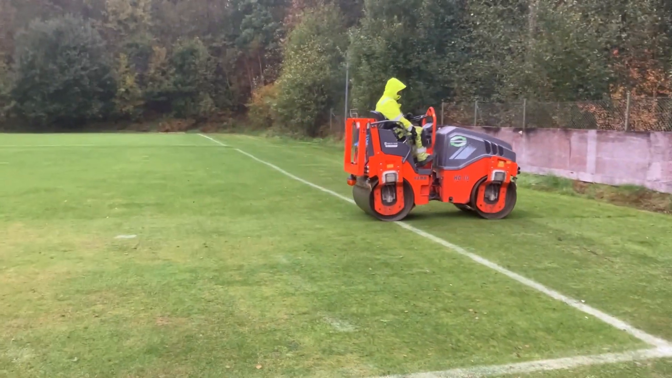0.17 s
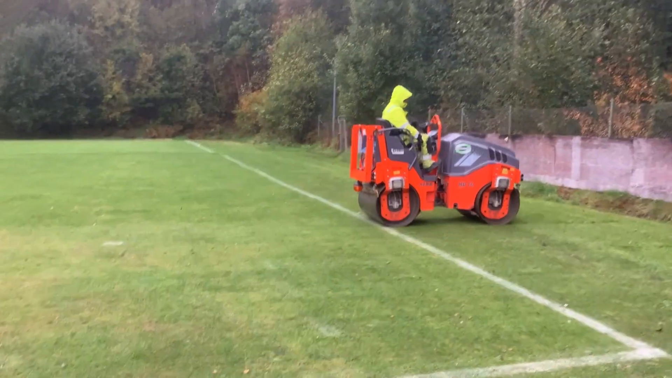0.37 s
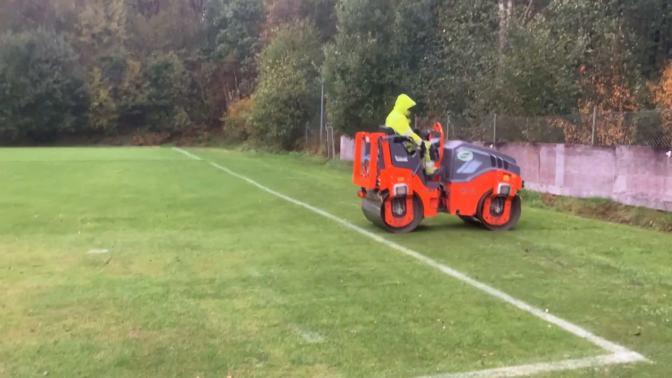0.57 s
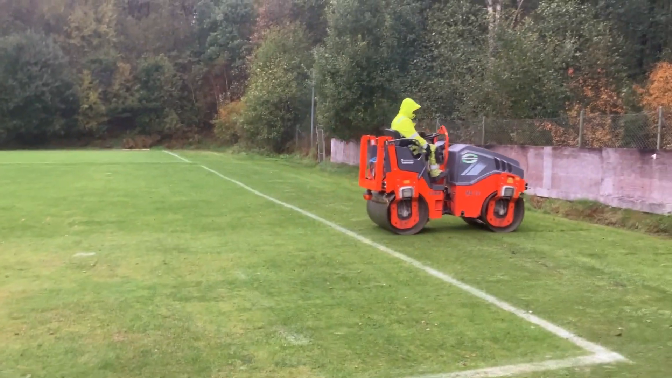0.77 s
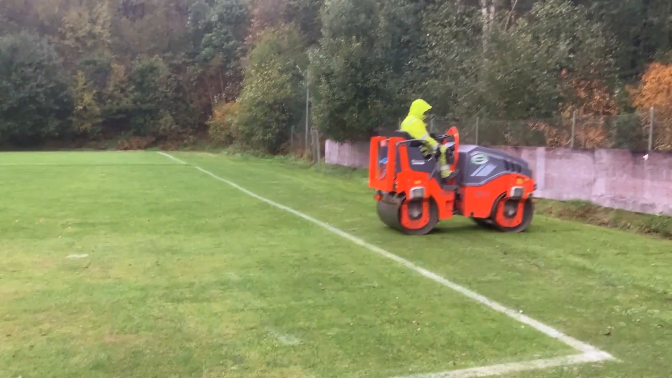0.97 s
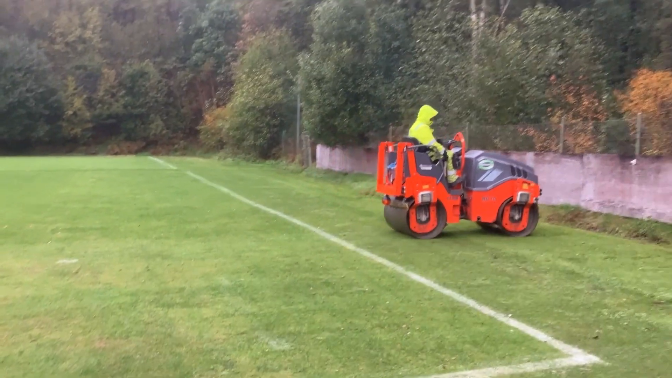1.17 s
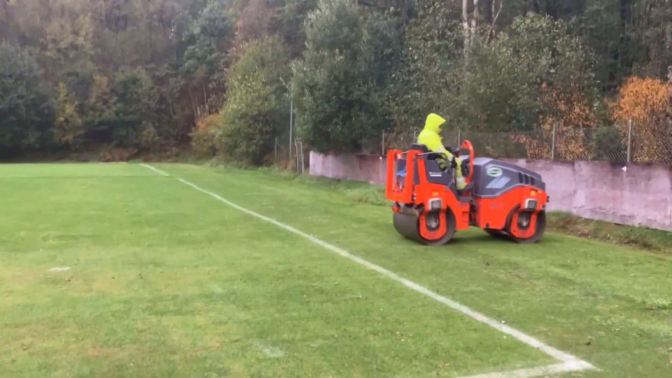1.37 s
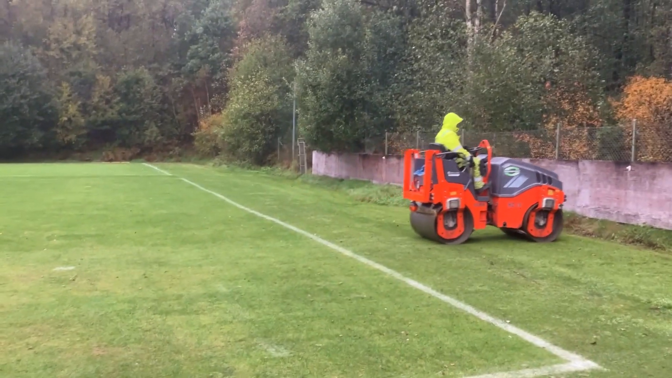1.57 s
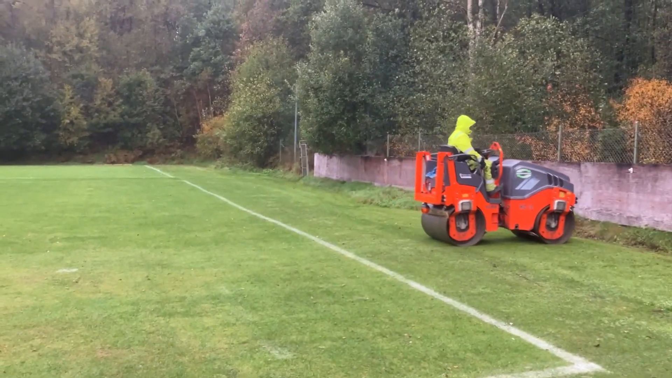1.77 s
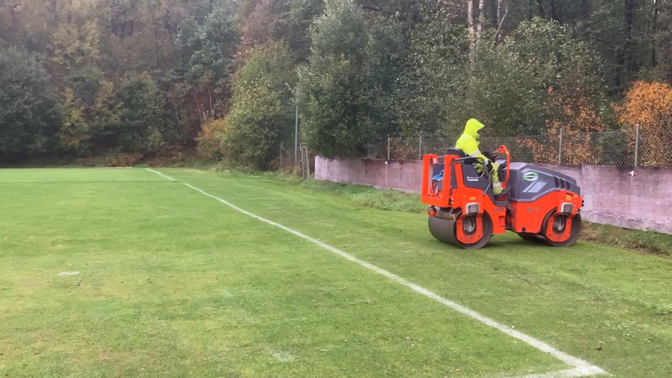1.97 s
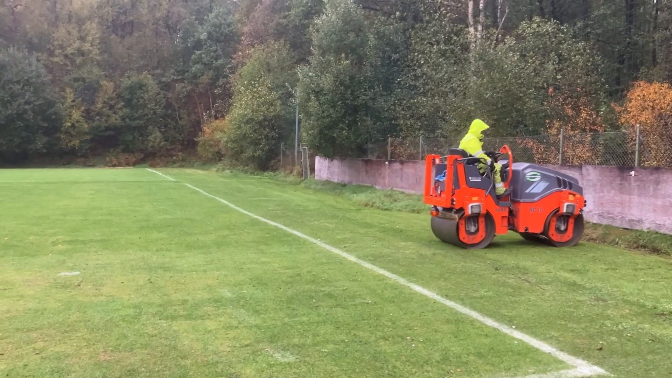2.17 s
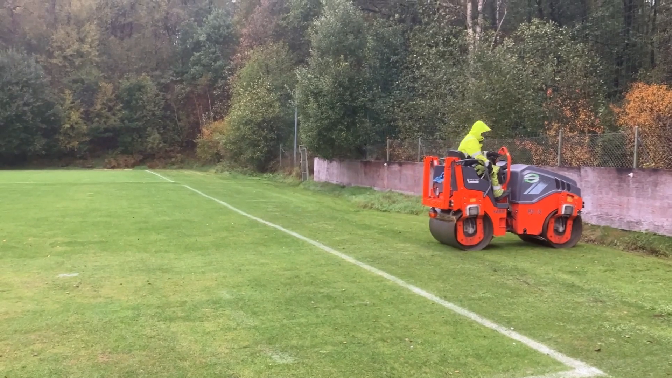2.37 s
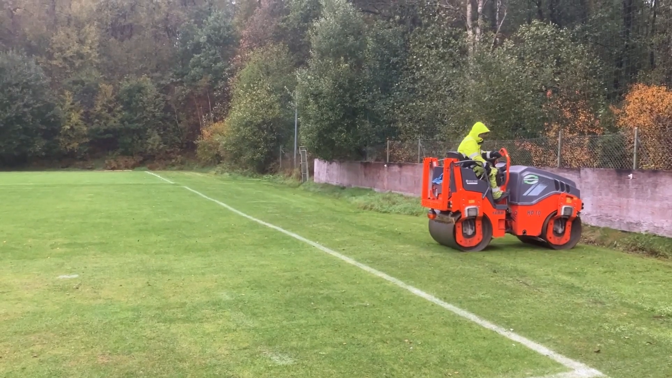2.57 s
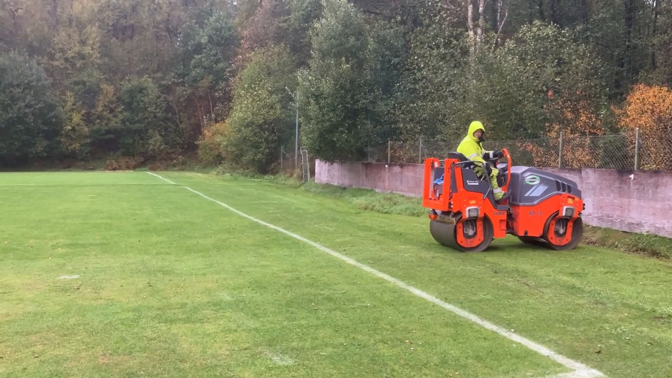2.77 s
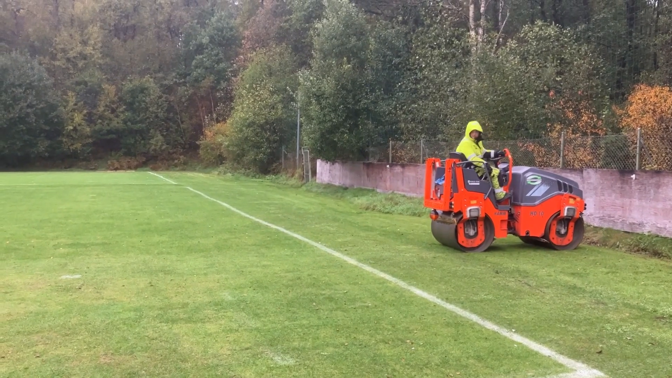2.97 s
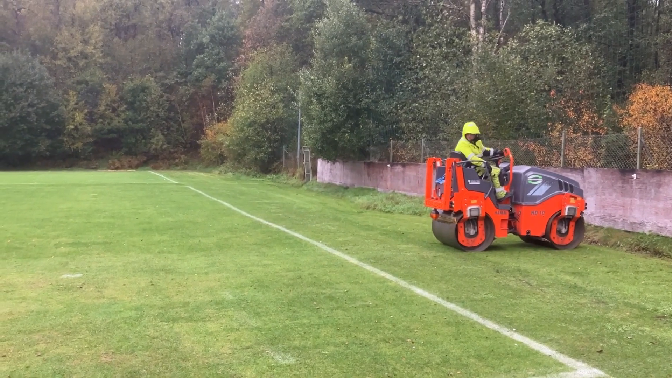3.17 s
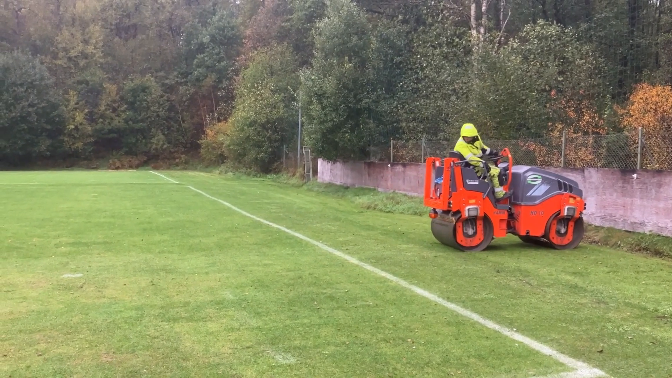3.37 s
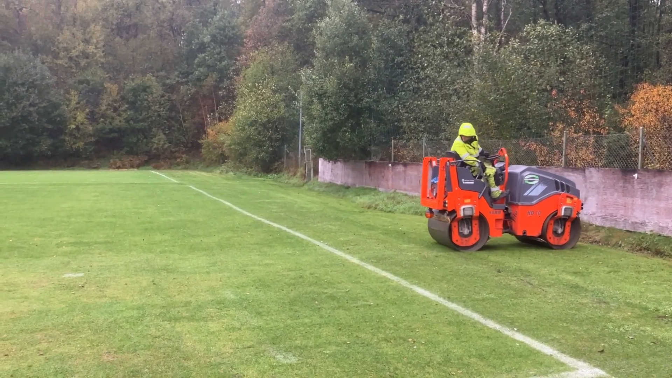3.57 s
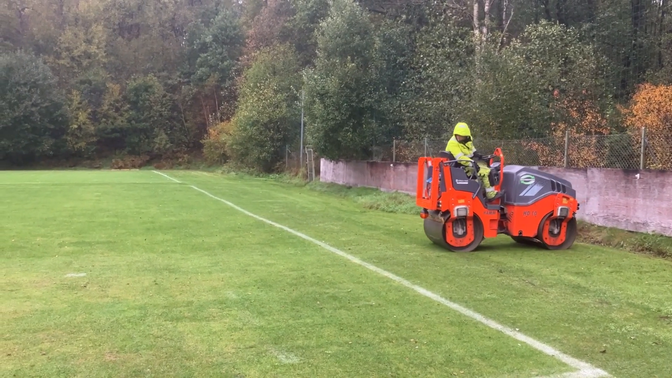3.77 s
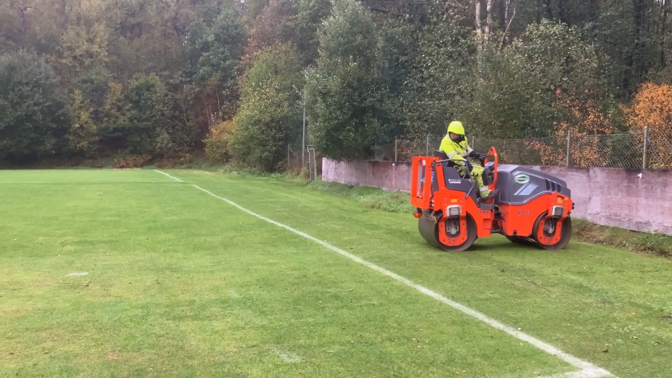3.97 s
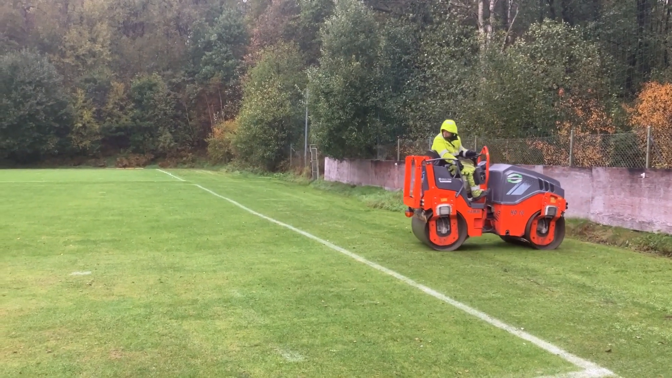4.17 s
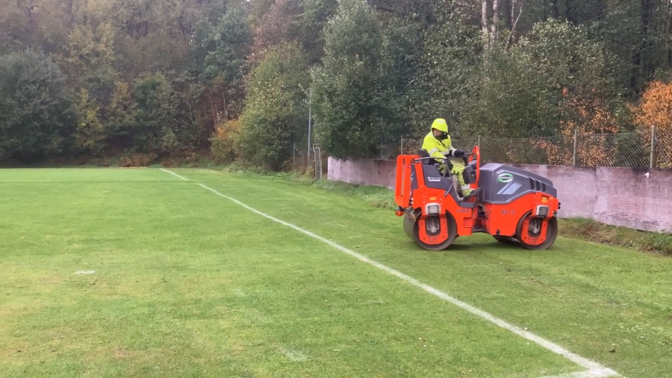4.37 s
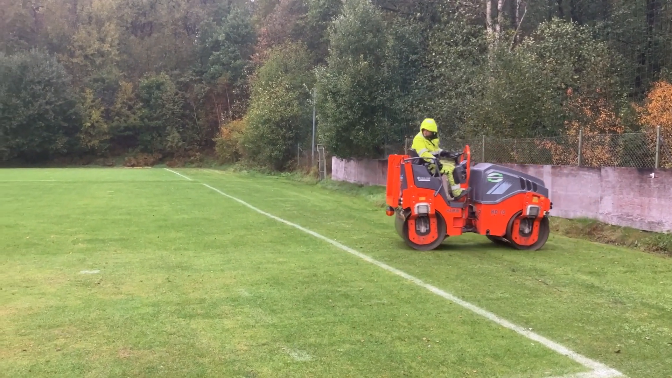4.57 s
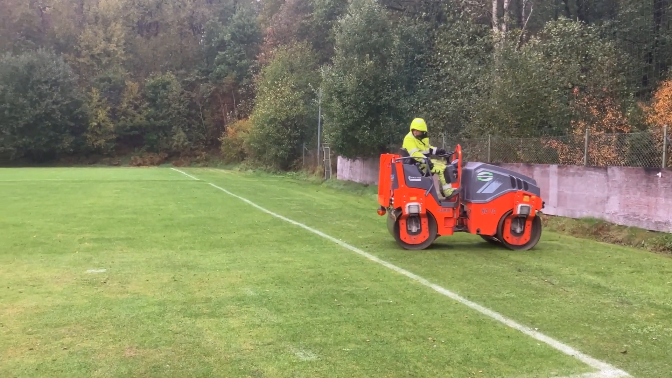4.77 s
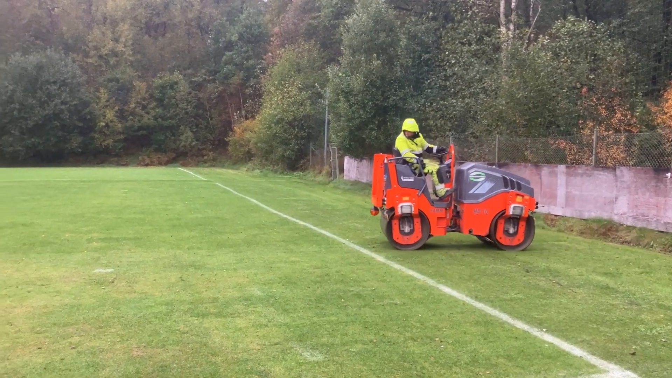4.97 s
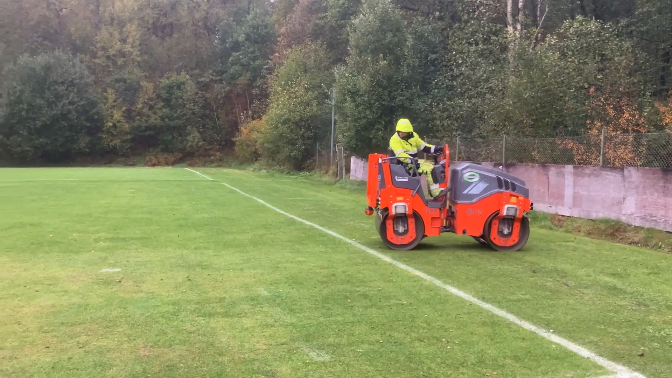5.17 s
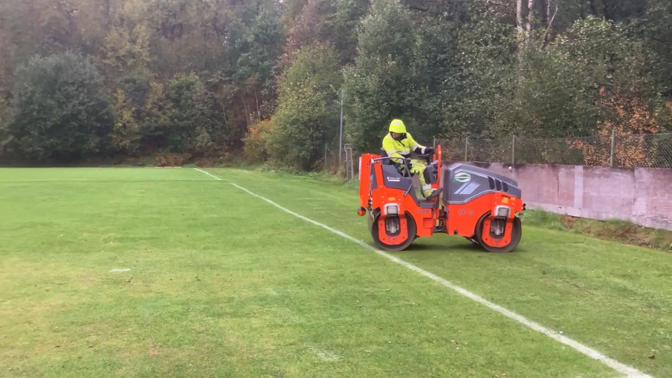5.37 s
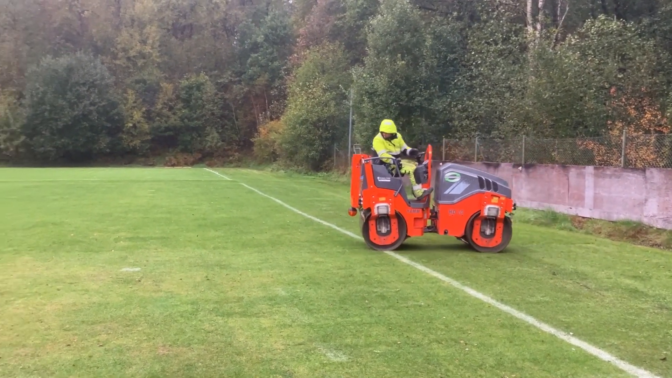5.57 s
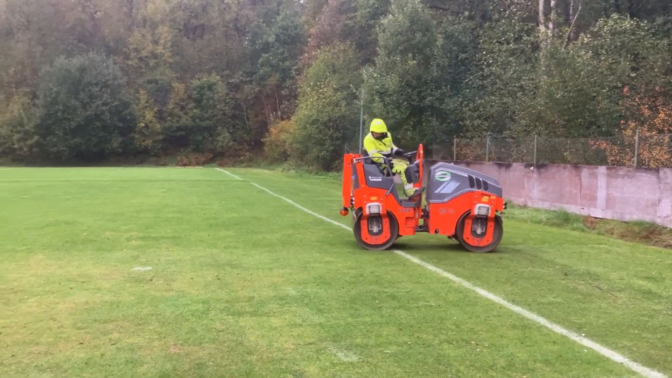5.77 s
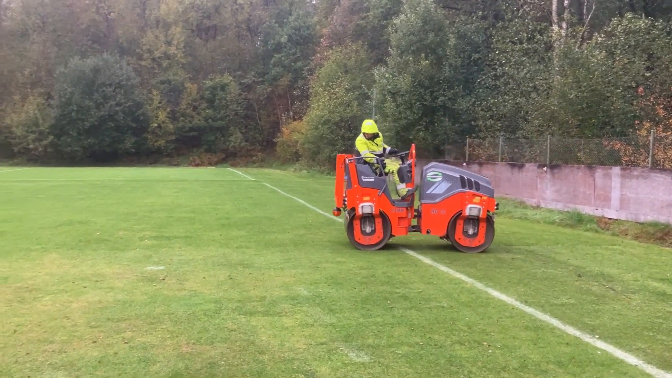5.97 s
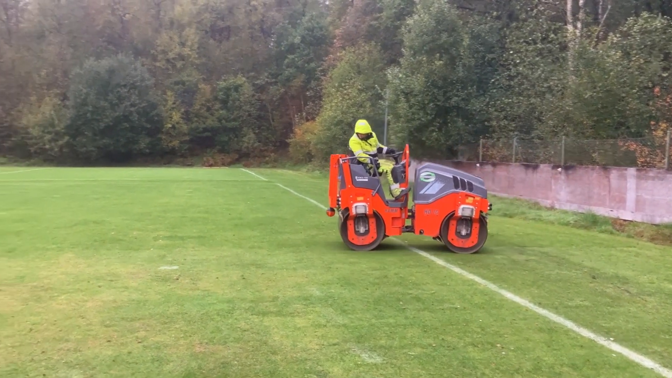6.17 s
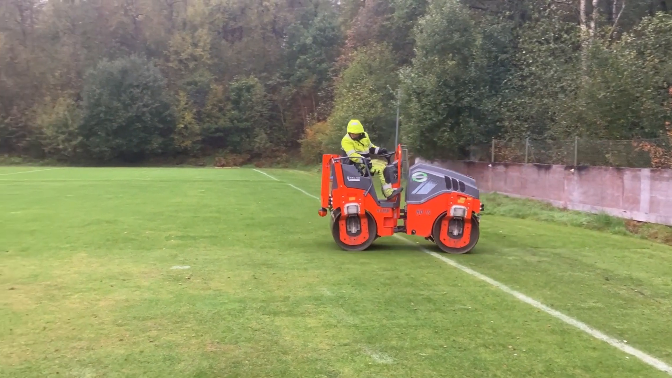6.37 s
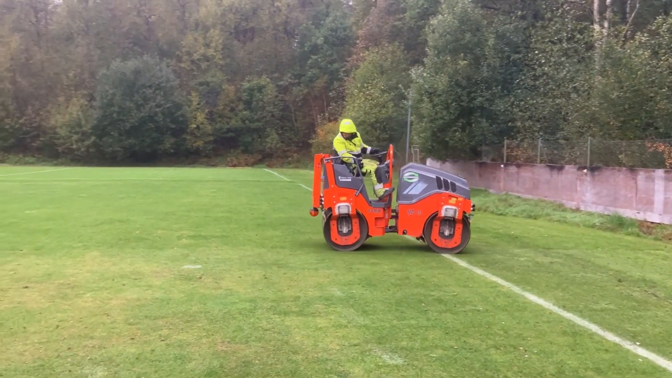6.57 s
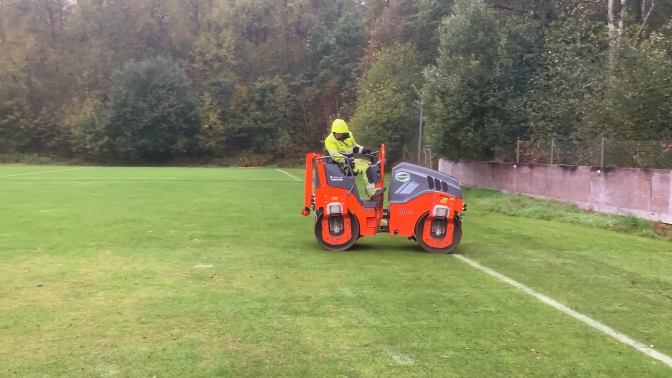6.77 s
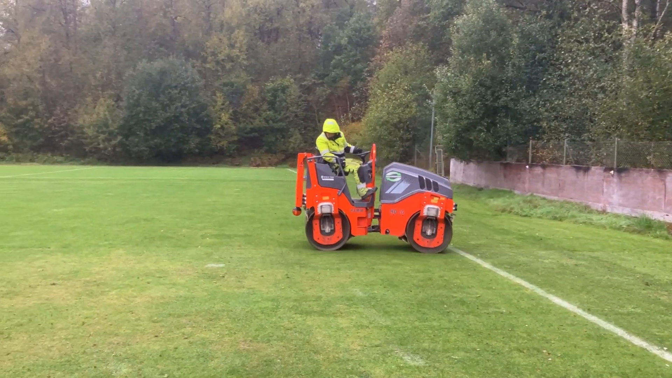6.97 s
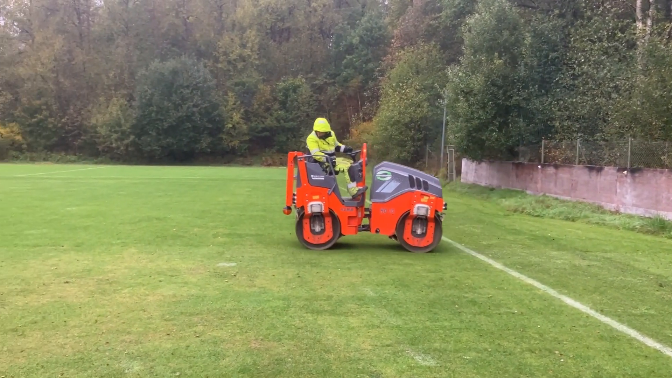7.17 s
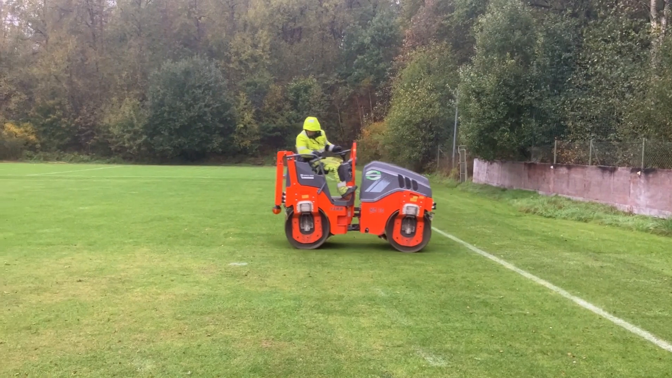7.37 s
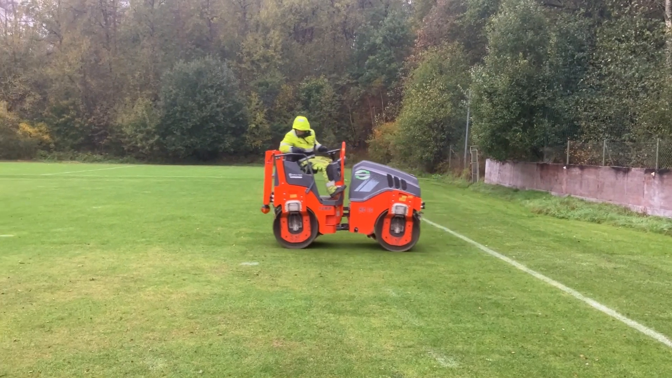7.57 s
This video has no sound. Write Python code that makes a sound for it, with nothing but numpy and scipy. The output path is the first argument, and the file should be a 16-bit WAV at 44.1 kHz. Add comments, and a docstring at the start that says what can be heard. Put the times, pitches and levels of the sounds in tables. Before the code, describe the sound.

Outdoors on a grass pitch, a small three-cylinder diesel roller drones at about 70 firings per second, with a strong octave, soft rumble, rapid ticking and hydraulic hiss, picked up in stereo from a moderate distance. At first the drums add a low hum and a motor whine near 800 Hz. From 0.8 s these glide down and fade, the engine easing slightly. Around 1.15 to 1.5 s the frame shudders and thuds and the steering joint clanks sharply; another dull knock comes at 1.75 s. The roller backs up, drive whine climbing, then steady among pump tones until about 4 s as it nears. At 4.8 s the drums spin up with a quick rising whine; the engine sags and strains. Speed overshoots, dips near 5.9 s, with a brief panel ring, then recovers. By 6.5 s a heavy low hum beats against the exhaust, continuing to the end at 7.6 s.

```python
"""The three-cylinder diesel of a small tandem roller drones on a grass pitch: an exhaust tone at the firing
rate and another an octave above it, weaker lines between them, and noise that flares at each firing.
Weights shake a drum with a hum. They coast down, the roller clanks and backs up, then they spin up
again: the engine is dragged down and the hum beats against the exhaust note. Gear motors and pumps
whine with the speed of their shafts, oil hisses, and a wall and trees scatter the sound."""
import sys
import numpy as np
from scipy import signal
from scipy.fft import rfft, irfft
from scipy.io import wavfile

SR = 44100
rng = np.random.default_rng(int(sys.argv[2]) if len(sys.argv) > 2 else 0)


def unload_audio(sound):
    """Save the sound as a 16-bit wav file, at the path given as the first command line argument."""
    columns = np.transpose(np.atleast_2d(sound))
    # keep every value between -1 and 1, then stretch to whole-number steps
    steps = np.round(np.clip(columns, -1, 1) * 32767)
    wavfile.write(sys.argv[1], SR, steps.astype(np.int16))


N = 336042
T = np.arange(N) / SR  # time of every sample [s]
HZ = np.fft.rfftfreq(N, 1 / SR)  # frequencies of the whole sound's spectrum

RUN_HZ = 66.4  # working speed of the weights, turns per second

# engine speed, sagging as the hydraulics draw power: (time [s], firing rate [firings per second])
FIRING_RATE = [(0, 70.05), (0.8, 70.05), (1.15, 71.5), (2.9, 71.5), (3.45, 70.59), (4.6, 70.49),
               (4.85, 68.37), (5.3, 66.4), (5.52, 68.9), (5.78, 66.8), (6.25, 67.86), (6.5, 69.88),
               (7.1, 69.4), (7.62, 69.4)]
# how hard the engine works: (time [s], load [0-1])
ENGINE_LOAD = [(0, 0.72), (1.15, 0.62), (1.7, 0), (2.5, 0.24), (3.5, 0.47), (3.85, 0.29), (4.5, 0.7),
               (4.9, 0.99), (6.3, 1), (6.6, 0.77), (7.62, 0.85)]
# roller's place on the field: (time [s], nearness [0-1])
NEARNESS = [(0, 0.59), (1.2, 0.36), (2, 0), (4.2, 0.27), (5.3, 0.87), (7.62, 0.98)]
# the weights are switched on again, overshoot and hunt before they settle:
# (time [s], front drum [turns per second], rear drum [turns per second])
RESTART = [(4.8, 0, 0), (5.15, 59.78, 57), (5.3, 62.88, 67.4), (5.47, 66.51, 69.7), (5.6, 61.63, 63),
           (5.8, 54.61, 58), (5.95, 53.22, 57), (6.05, 55.22, 62), (6.2, 58.87, 64), (6.35, 65.18, 67.4),
           (6.5, 66.53, 68.3), (6.8, 66.91, 66.3), (7, 65.8, 65.6), (7.62, 65.99, 65.7)]
# colour of the low rumble: (frequency [Hz], relative level [dB per Hz])
RUMBLE_COLOUR = [(20, -28), (35, -9), (50, -6), (90, -1), (170, -1), (290, -8.5), (370, -16), (500, -17),
                 (1000, -76.5)]


def amp(db):
    """Turns decibels into gain."""
    return 10 ** (np.asarray(db) / 20)


def unit(x):
    """Scales a sound to rms 1."""
    return x / np.sqrt(np.mean(x ** 2) + 1e-20)


def curve(rows, axis=1):
    """Reads one column of a time table at every sample."""
    rows = np.array(rows)
    return np.interp(T, rows[:, 0], rows[:, axis])


def shape(rows, hz, axis=1):
    """Reads one column of a frequency table, joined on a log axis."""
    rows = np.array(rows)
    return np.interp(np.log(hz + 1), np.log(rows[:, 0] + 1), rows[:, axis])


def colour(x, rows):
    """Filters a sound by a frequency table and scales it to rms 1."""
    return unit(irfft(rfft(x) * amp(shape(rows, HZ)), N))


def octave_band(x, hz, octaves):
    """Keeps a bell-shaped band around one frequency."""
    distance = np.log2((HZ + 1) / hz) / octaves
    return irfft(rfft(x) * np.exp(-.5 * distance ** 2), N)


def wander(rate_hz):
    """Drifts slowly at random, with rms 1."""
    steps = N // 40
    hz = np.fft.rfftfreq(steps, T[-1] / steps)
    slow = irfft(rfft(rng.standard_normal(steps)) / (1 + (hz / rate_hz) ** 4), steps)
    return unit(np.interp(T, np.linspace(0, T[-1], steps), slow))


def tone(turns, rough, rate_hz):
    """Makes a machine tone of rms 1 whose strength and phase waver."""
    sway = 1 + rough * (wander(rate_hz) + 1j * wander(rate_hz))
    return unit((sway * np.exp(2j * np.pi * turns)).real)


def bursts(firings, length, steady, lead=.22):
    """Makes noise that flares just ahead of each exhaust pulse and dies away (times in firings)."""
    # force of each cylinder's firing: (level [dB])
    cylinder_db = (3, -2, -0.5)
    turns = firings + lead
    force = amp(cylinder_db)[turns.astype(int) % len(cylinder_db)]
    flare = force * np.exp(-(turns % 1) / length)
    return (steady + flare) * rng.standard_normal(N)


def blow(ring, s, db, decay, rise_s):
    """Shapes a ringing noise into one blow that rises fast and dies away."""
    age = np.maximum(T - s, 0)
    sound = ring * (1 - np.exp(-age / rise_s)) * np.exp(-age / decay)
    return amp(db) * sound * np.sqrt(decay * SR / np.sum(sound ** 2))


def drag():
    """Tells how far oil pressure pulls the engine below its free speed (square root of the sag in Hz)."""
    free_hz = 71.66  # firings per second with nothing to drive
    return np.sqrt(np.maximum(free_hz - curve(FIRING_RATE), 0))


def effort(load_db=-0.3, near_db=4.0):
    """Gives engine noise in dB about its mean: it rises with nearness and falls very slightly with load."""
    level = load_db * curve(ENGINE_LOAD) + near_db * curve(NEARNESS)
    return level - level.mean()


def vibrator(column, slip=0):
    """Gives speed and turn count of one drum's weights: steady, coasting down, then started again."""
    switch_off_s, coast_s = .81, .62
    coasting = (RUN_HZ + slip) * np.exp(-np.maximum(T - switch_off_s, 0) / coast_s)
    spinning = curve(RESTART, axis=column)
    again = spinning > 0
    speed = np.where(again, spinning, coasting)
    turns = np.where(again, np.cumsum(spinning), np.cumsum(coasting)) / SR
    return speed, turns


def unsettled():
    """Gives a number of decibels that is largest at the second start and shrinks on either side of it."""
    settle_db, settle_s = 98, 0.59
    return settle_db * np.exp(-abs(T - RESTART[0][0]) / settle_s)


def field(db=-36):
    """Low rumble spreads over the open ground, unrelated at the two microphone ports."""
    rumble = np.array([colour(rng.standard_normal(N), RUMBLE_COLOUR) for _ in range(2)])
    return amp(db + effort()) * rumble


def surroundings(x, drift_hz=4):
    """Wall and trees scatter the sound: phases are scrambled differently at each port and keep drifting."""
    # strength of the scattered sound: (frequency [Hz], gain [dB])
    scatter_gain = [(70, -9), (140, -14), (250, -5.5), (600, -8), (1300, -1.5), (2500, -0.5), (5000, -2.5),
                    (8000, -10.5), (15000, -89)]
    hz, t, z = signal.stft(x, SR, nperseg=2048, noverlap=1536)
    chance = rng.standard_normal((2, *z.shape)) + 1j * rng.standard_normal((2, *z.shape))
    slow = np.exp(-.5 * (np.fft.fftfreq(len(t), t[1]) / drift_hz) ** 2)
    # only the drifting phase is kept
    paths = np.exp(1j * np.angle(np.fft.ifft(np.fft.fft(chance) * slow)))
    gain = amp(shape(scatter_gain, hz))[:, None]
    scattered = signal.istft(z * paths * gain, SR, noverlap=1536)[1]
    return np.sqrt(2) * scattered[:, :N]


def ports(x):
    """Direct sound reaches the two microphone ports out of step, by an amount that follows the roller."""
    # head start of the left port: (frequency [Hz], roller at the far end [radians], nearer [radians])
    left_lead = [(100, 0, 0), (500, -.8, -.3), (1200, -1.2, -.3), (2000, -3, -.4), (3100, -9.4, -4.9),
                 (4100, -12.5, -8.2), (6000, -16.6, -10.3), (6550, -15.7, -9.4), (7900, -12.6, -6.3),
                 (9850, -9.4, -3.1), (11400, -6.3, 0), (13100, -3.1, 3.1), (14700, 0, 6.3)]
    hz, t, z = signal.stft(x, SR, nperseg=1024)
    near = np.clip(np.interp(t, T, curve(NEARNESS)), 0, 1)
    far_lead = np.exp(1j * shape(left_lead, hz, axis=1))[:, None]
    near_lead = np.exp(1j * shape(left_lead, hz, axis=2))[:, None]
    lead = np.exp(1j * np.angle((1 - near) * far_lead + near * near_lead))
    left = signal.istft(z * lead, SR)[1][:N]
    return np.array([left, x])


def over_grass(x, dip_hz=780, octaves=0.091, depth=0.42):
    """The reflection off the turf cancels part of the midrange, more so when the roller is far."""
    band = octave_band(x, dip_hz, octaves)
    return x - depth * (1 - curve(NEARNESS)) ** 2 * band


def judder(db=-28.0, hz=65, octaves=0.35, middle_s=1.3, half_s=0.63):
    """The frame shudders on its rubber mounts while the roller stops and starts back: swelling low noise."""
    shake = octave_band(rng.standard_normal(N), hz, octaves)
    return amp(db) * np.exp(-((T - middle_s) / half_s) ** 2) * unit(shake)


def knocks(rise_s=0.0057):
    """Slack in the frame is taken up as the roller turns back and the drums stop or start: damped blows."""
    # blows: (time [s], level [dB], centre [Hz], width [octaves], decay [s])
    frame_blows = [(1.155, -17, 70, 0.62, 0.021), (1.382, -20.5, 170, 0.45, 0.0091),
                   (1.428, -31, 480, 0.46, 0.026), (1.444, -24, 230, 0.35, 0.011),
                   (1.478, -22, 130, 0.52, 0.024), (1.753, -14, 80, 0.22, 0.028),
                   (1.765, -41, 8100, 0.22, 0.013), (1.83, -42, 8000, .25, .012),
                   (1.895, -44, 8000, 0.23, .012), (4.96, -37, 1400, 0.57, 0.084),
                   (5.355, -25.5, 620, 0.41, .016)]
    out = np.zeros(N)
    for s, db, hz, width, decay in frame_blows:
        ring = octave_band(rng.standard_normal(N), hz, width)
        out += blow(ring, s, db, decay, rise_s)
    return out


def clanks(rise_s=0.0024):
    """The steering joint chatters, strikes its stop and rebounds: short blows of coloured noise."""
    # blows as the roller changes direction: (time [s], level [dB], decay [s])
    joint_blows = [(1.347, -38, .015), (1.362, -32, 0.015), (1.38, -22.5, .009), (1.392, -30, 0.0079),
                   (1.43, -35, 0.018)]
    # what the joint rings with: (frequency [Hz], relative level [dB per Hz])
    joint_colour = [(300, -11), (650, -4), (1100, 3.5), (1450, -1), (1850, 0.5), (2200, -5), (2420, -24),
                    (3500, -20), (5000, -47)]
    out = np.zeros(N)
    for s, db, decay in joint_blows:
        ring = colour(rng.standard_normal(N), joint_colour)
        out += blow(ring, s, db, decay, rise_s)
    return out


def panel():
    """A panel sings briefly at one pitch while the weights linger at low speed."""
    middle_s, half_s, hz, db = 5.98, .15, 1095, -41.5
    swell = np.exp(-((T - middle_s) / half_s) ** 4)
    return amp(db) * swell * tone(hz * T, rough=.3, rate_hz=7.4)


def bonnet(firings, ring_hz=1310, width_hz=55, db=-50, far_db=17):
    """Firings make a bonnet panel ring with a few metallic lines, louder as the roller comes near."""
    # lines, before the fading with distance: (multiple of the four-stroke cycle, level [dB])
    bonnet_orders = [(54, -58), (55, -45.5), (57, -51), (59, -46)]
    noise = bursts(firings, length=0.12, steady=0.36)
    ring = irfft(rfft(noise) / (1 + ((HZ - ring_hz) / width_hz) ** 2), N)
    lines = sum(amp(level) * tone(k * firings / 3, rough=.5, rate_hz=3) for k, level in bonnet_orders)
    return (amp(db) * unit(ring) + lines) * amp(-far_db * (1 - curve(NEARNESS)))


def drive(power=1.2):
    """Drive motors' tones climb and swell with the ground speed backwards, then sink and fade."""
    reverse_s, gather_s, shaft_hz = 1.0, .36, 22.05
    ease_at_s, ease_s, ease_hz = 3.0, 1.0, 1.54  # the driver eases off
    # lines, before the swell and fade: (multiple of the shaft's turn, level [dB])
    drive_orders = [(12, -41.5), (13, -34.5), (14, -35.5)]
    gathered = 1 - np.exp(-np.maximum(T - reverse_s, 0) / gather_s)
    easing = np.clip((T - ease_at_s) / ease_s, 0, 1) ** 3
    turns = np.cumsum(shaft_hz * gathered - ease_hz * easing) / SR
    lines = sum(amp(db) * tone(k * turns, rough=.25, rate_hz=8) for k, db in drive_orders)
    return lines * gathered ** power * (1 - easing)


def charge_pump(firings):
    """A second pump hums at sixteen times the four-stroke cycle, swelling and fading."""
    # loudness of its tone: (time [s], level [dB])
    charge_level = [(0.05, -34.5), (0.21, -44), (0.4, -32), (0.62, -41), (0.88, -32), (1.08, -45),
                    (1.3, -42.5), (1.68, -37), (1.95, -46.5), (2.55, -48), (2.85, -50), (3.15, -44),
                    (3.6, -48), (3.8, -33), (4.1, -53), (4.45, -34.5), (4.72, -56), (5.08, -34.5),
                    (5.35, -43.5), (5.6, -31.5), (5.97, -42), (6.15, -36.5), (6.6, -36), (7.15, -35),
                    (7.4, -45), (7.6, -30.5)]
    return amp(curve(charge_level)) * tone(16 * firings / 3, rough=.22, rate_hz=8)


def pump(firings, overtone_db=-17):
    """The hydraulic pump sings at eight strokes to a firing, with a weaker tone at three times that."""
    # loudness of its main tone: (time [s], level [dB])
    pump_level = [(0, -56), (1, -40.5), (1.2, -44), (1.65, -40), (2.33, -41.5), (2.5, -53), (2.7, -40),
                  (3.4, -41), (3.9, -36), (4.65, -32.5), (5.05, -44.5), (6.2, -41), (6.6, -38.5),
                  (7.62, -61)]
    strokes = 8 * firings
    main = tone(strokes, rough=.16, rate_hz=12)
    overtone = amp(overtone_db) * tone(3 * strokes, rough=.25, rate_hz=10)
    return amp(curve(pump_level)) * (main + overtone)


def singing_valve(firings):
    """A valve sings briefly at multiples of the firing rate."""
    middle_s, half_s = 3.44, .21
    # lines at the height of the song: (multiple of the firing rate, level [dB])
    sing_orders = [(16, -54), (24, -51), (36, -58)]
    lines = sum(amp(db) * tone(k * firings, rough=0.14, rate_hz=7.3) for k, db in sing_orders)
    return np.exp(-((T - middle_s) / half_s) ** 4) * lines


def oil(speed, turns, hiss_db=-49.5, squirt_db=-56, pressure_db=4.0, flow_db=4.0, near_db=0.5):
    """Oil hisses with flow and pressure; under heavy load it squirts past the gear teeth in pulses."""
    # relief valve starts to open below this firing rate, and would be wide open this much lower
    relief_hz, relief_span_hz = 69.2, 4.3
    # colour of the hiss: (frequency [Hz], relative level [dB per Hz])
    hiss_colour = [(3000, -16.5), (5200, -6), (6500, -3.5), (7600, -2), (8500, 2), (9400, -4.5),
                   (11000, -9), (12500, -14), (14000, -21), (16000, -63)]
    # colour of the squirting: (frequency [Hz], relative level [dB per Hz])
    squirt_colour = [(100, -60), (3000, -23), (6500, -37), (8500, 14), (11500, -16), (15000, 15)]
    relief = np.clip((relief_hz - curve(FIRING_RATE)) / relief_span_hz, 0, 1)
    # twelve gear teeth to a turn, slightly unevenly timed
    teeth = 12 * turns + 0.0033 * wander(57)
    pulses = np.exp(60 * (np.cos(2 * np.pi * teeth) - 1))
    squirts = colour(unit(pulses) + .7 * rng.standard_normal(N), squirt_colour)
    hiss = colour(rng.standard_normal(N), hiss_colour)
    flow = np.sqrt(speed / RUN_HZ)
    change_db = pressure_db * drag() + flow_db * flow + near_db * curve(NEARNESS) + 0.84 * wander(20)
    return (amp(hiss_db) * hiss + amp(squirt_db) * relief * squirts) * amp(change_db)


def whine(turns, column):
    """A gear motor's whine glides with its weights, rougher around the second start."""
    # loudness of each motor's whine, rising, dipping and beating:
    # (time [s], front base level [dB], rear base level [dB])
    whine_level = [(0.8, -33.5, -36.5), (0.93, -42, -44), (1.05, -47, -57), (1.25, -65, -62),
                   (4.85, -62, -66), (5.18, -54, -43), (5.44, -56, -40.5), (5.52, -54, -59),
                   (5.68, -57, -42), (5.8, -56, -45), (5.9, -55, -52), (6.02, -49, -38), (6.15, -40, -43),
                   (6.35, -46, -38.5), (6.54, -45, -39), (6.65, -62, -33.5), (6.85, -59, -42.5),
                   (7.02, -59, -34), (7.09, -56, -47), (7.32, -61, -37.5), (7.62, -54, -41)]
    # lines, against that base level: (multiple of the weights' turn, level [dB])
    motor_orders = [(11, -9), (12, 5.5), (13, -7.5), (21, -17), (24, -13)]
    rough = .1 + np.minimum(.015 * unsettled(), .25)
    teeth = sum(amp(db) * tone(k * turns, rough=rough, rate_hz=15) for k, db in motor_orders)
    return amp(curve(whine_level, axis=column)) * teeth


def drum_hum(speed, turns, hum_power=5.1, octave_db=-5):
    """Turning weights shake the drum: the hum grows steeply with speed and builds up after the restart."""
    # hum at working speed, before the mounts' swell: (first run [dB], after the restart [dB])
    first_db, again_db = (-27, -17.5)
    # the drum swells as it passes the resonance of its mounts
    mount_hz, mount_width_hz, mount_swell_db = 59, 5.3, 8.5
    before_restart = T < RESTART[0][0]
    hum_db = np.where(before_restart, first_db, again_db - unsettled())
    mount_db = mount_swell_db * np.exp(-((speed - mount_hz) / mount_width_hz) ** 2)
    force = np.sqrt(2) * amp(hum_db + mount_db) * (speed / RUN_HZ) ** hum_power
    angle = 2 * np.pi * turns
    # the drum strikes the turf once a turn, which adds an octave
    return force * (np.cos(angle) - amp(octave_db) * np.cos(2 * angle))


def engine(firings, rumble_db=-31, block_db=-33, injector_db=-42, rumble_follow=1.0, line_follow=1.55):
    """Unequal cylinders give lines between the firing tones; firings shake panels and tick injectors."""
    # lines at mean effort: (multiple of the four-stroke cycle, level [dB])
    engine_orders = [(4, -36), (5, -42.5), (7, -45), (9, -33), (10, -38.5), (11, -44.5), (12, -38),
                     (13, -41), (14, -45.5), (18, -49), (21, -49.5), (25, -47), (36, -50.5), (54, -55)]
    # colour of the shaken block and panels: (frequency [Hz], relative level [dB per Hz])
    block_colour = [(150, -10.5), (380, 0.5), (500, 1), (680, 1), (1050, -4.5), (1300, -3.5), (1500, -6.5),
                    (1950, -9), (2400, -14.5), (4000, -38)]
    # colour of the injector ticks: (frequency [Hz], relative level [dB per Hz])
    tick_colour = [(1200, -0.5), (2300, -14), (2700, -1.5), (3150, 2.5), (3700, -1.5), (4200, 0),
                   (4700, -3.5), (5600, -3), (7000, -23), (10000, -43), (16000, -38)]
    effort_db = effort()
    lines = sum(amp(db) * tone(k * firings / 3 + rng.random(), rough=.25, rate_hz=3)
                for k, db in engine_orders)
    rumble = colour(bursts(firings, length=0.15, steady=0.23), RUMBLE_COLOUR)
    rumble *= amp(rumble_db + rumble_follow * effort_db)
    block = colour(bursts(firings, length=0.097, steady=1.0), block_colour)
    block *= amp(block_db + effort_db + 0.14 * wander(26))
    ticks = colour(bursts(firings, length=0.069, steady=0.81), tick_colour)
    ticks *= amp(injector_db + 0.15 * wander(35))
    return lines * amp(line_follow * effort_db) + rumble + over_grass(block) + ticks


def exhaust(firings):
    """The silencer leaves a strong tone at the firing rate and another an octave above; both waver."""
    # firing tone, growing as the engine is dragged down: (running free [dB], gain per unit of drag [dB])
    free_db, drag_db = (-29, 6.5)
    # its octave, growing with load: (unloaded [dB], gain at full load [dB])
    unloaded_db, load_db = (-34, 21.5)
    # fuel is cut back as the vibrator's load falls away, and the firing tone dips
    cut_s, cut_half_s, cut_depth_db = 1.13, 0.18, -9
    cut_db = cut_depth_db * np.exp(-((T - cut_s) / cut_half_s) ** 2)
    first = amp(free_db + drag_db * drag() + cut_db)
    second = amp(unloaded_db + load_db * curve(ENGINE_LOAD))
    angle = 2 * np.pi * firings
    uneven = 1 + .08 * wander(14)
    return -np.sqrt(2) * (first * np.cos(angle) + second * np.cos(2 * angle)) * uneven


def scene(sideways=0.54):
    """Adds the machine's direct sound, its scattered sound and the rumble of the open ground."""
    firings = np.cumsum(curve(FIRING_RATE)) / SR
    front_speed, front_turns = vibrator(1)
    # in the first run the rear motor is slightly faster [turns per second], so the two whines beat
    _, rear_turns = vibrator(2, slip=.48)

    tones = exhaust(firings) + drum_hum(front_speed, front_turns)
    tones += whine(front_turns, 1) + whine(rear_turns, 2)
    tones += pump(firings) + charge_pump(firings) + drive()
    clatter = engine(firings) + singing_valve(firings) + oil(front_speed, front_turns)
    clatter += bonnet(firings) + panel() + knocks() + clanks() + judder()

    # taking away part of what both ports share leaves the tones' echo mostly at the sides
    echo = surroundings(tones)
    tone_echo = echo - sideways * echo.mean(0)
    return ports(tones + clatter) + tone_echo + surroundings(clatter) + field()


def record(dry, low_cut_hz=38):
    """Applies slightly unequal microphones with a low cut, a soft ceiling on high peaks and a band limit."""
    # microphone mismatch: (frequency [Hz], left minus right [dB])
    mismatch = [(70, 1), (140, .6), (250, -.2), (700, -2.3), (2500, -1.4), (4500, .1), (9000, 0)]
    edge_hz = 15700
    balance = amp(np.outer([.5, -.5], shape(mismatch, HZ)))
    low_cut = 1 / np.sqrt(1 + (low_cut_hz / (HZ + 1)) ** 6)
    heard = irfft(rfft(dry) * balance * low_cut, N)
    held = heard / (1 + (heard / .95) ** 8) ** (1 / 8)
    band_limit = signal.firwin(511, edge_hz, window=("kaiser", 9), fs=SR)
    return signal.oaconvolve(held, band_limit[None], "same")


dry = scene()
out = record(dry)
unload_audio(out)
```